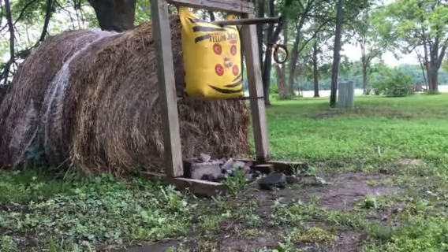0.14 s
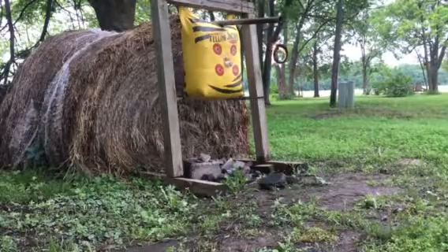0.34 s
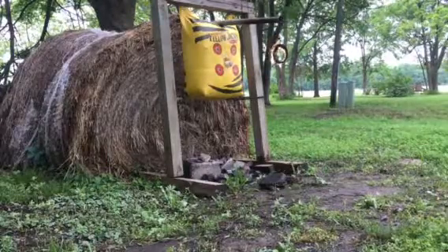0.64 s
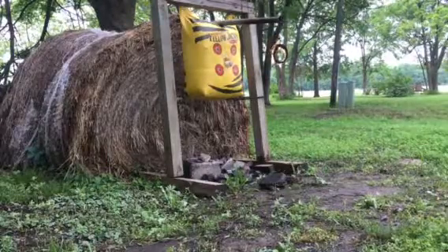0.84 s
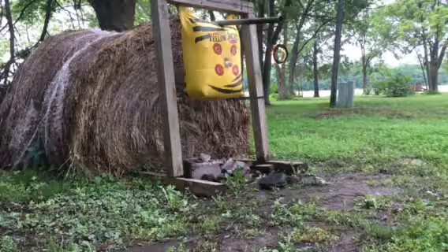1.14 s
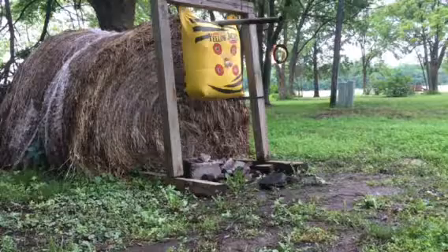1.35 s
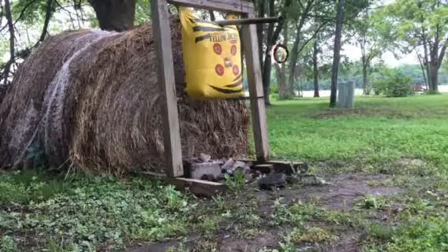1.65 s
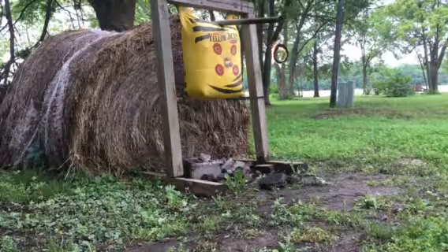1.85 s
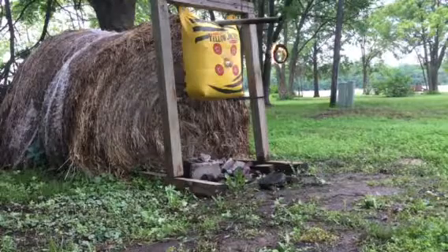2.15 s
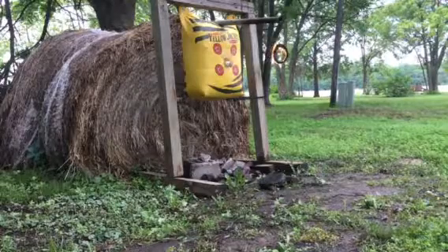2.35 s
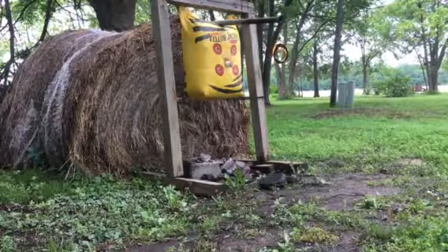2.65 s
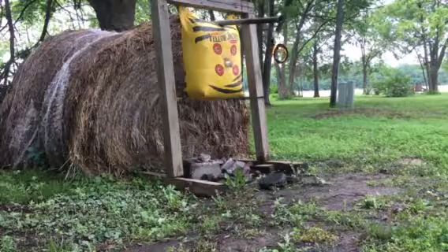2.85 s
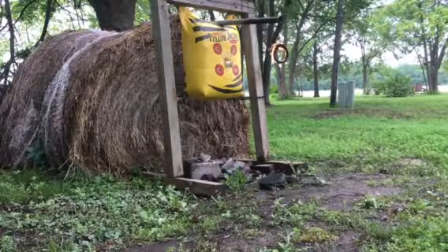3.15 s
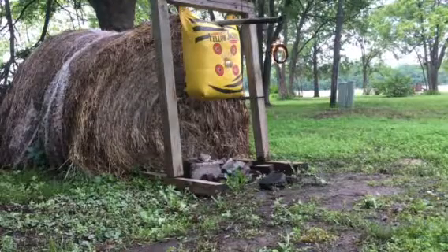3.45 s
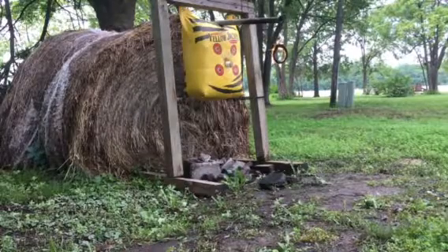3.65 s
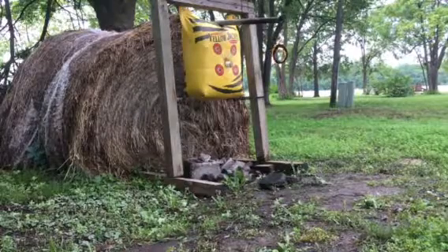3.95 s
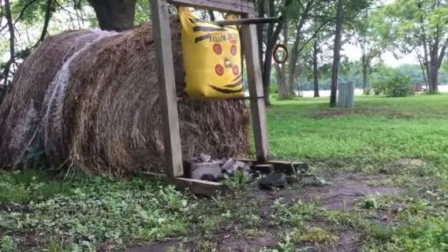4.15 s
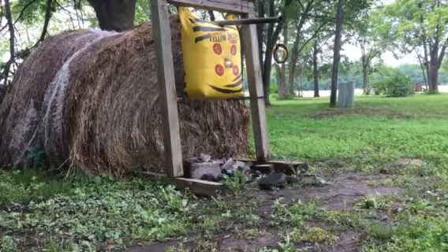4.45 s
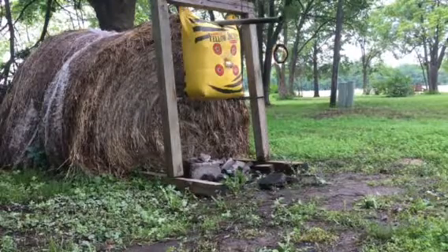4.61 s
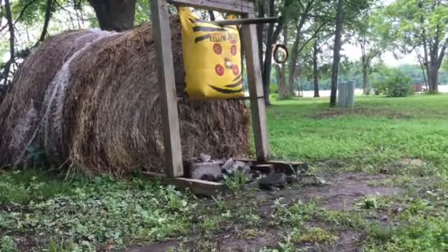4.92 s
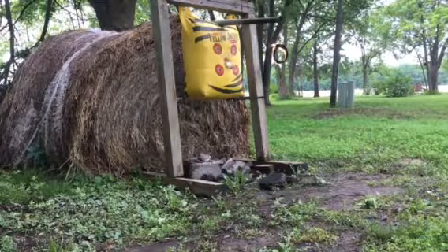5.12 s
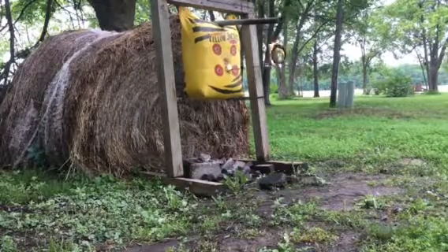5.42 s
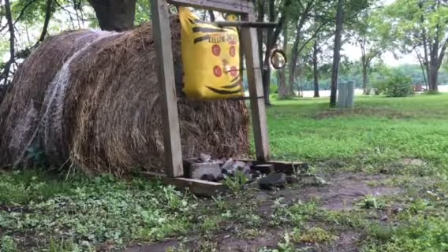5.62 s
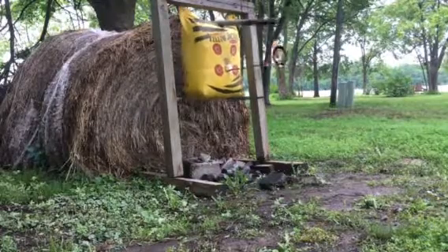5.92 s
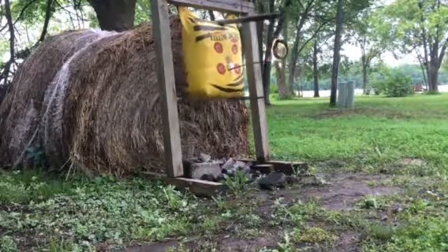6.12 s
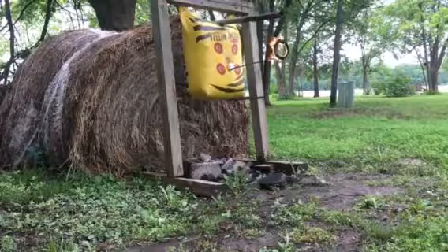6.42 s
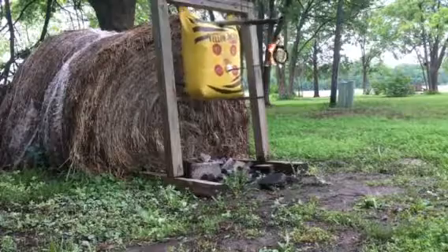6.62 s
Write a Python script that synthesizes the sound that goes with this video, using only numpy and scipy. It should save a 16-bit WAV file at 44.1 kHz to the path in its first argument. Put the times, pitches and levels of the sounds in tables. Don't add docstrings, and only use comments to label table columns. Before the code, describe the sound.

Outdoors on a tree-ringed lawn, uneven wind thumps and flutters on an exposed microphone over a soft wash of leaves. Faint birds whistle and trill, mostly far and echoey, with one hoarse high trill nearer. After about five and a half seconds a bowstring snaps, followed almost at once by a loud, dry double smack into a stuffed bag. Trunks scatter it back, then a faint tree-line echo fades under the wind.

```python
import sys
import numpy as np
from scipy import signal
from scipy.fft import rfft, irfft, next_fast_len
from scipy.io import wavfile

SR = 44100
rng = np.random.default_rng(int(sys.argv[2]) if len(sys.argv) > 2 else 0)


def attenuation_scalar(level_db):
    decades = np.asarray(level_db, float) / 20
    return 10 ** decades


def output_pcm(signal):
    pcm = np.clip(np.atleast_2d(signal).T, -1, 1) * 32767
    wavfile.write(sys.argv[1], SR, np.round(pcm).astype(np.int16))


N = 298645
T = np.arange(N) / SR

# t/s, level/dB
WIND = [(0.0, -59.5), (.3, -47.5), (.62, -52), (.92, -40.5), (1.02, -51), (1.4, -43.5), (1.56, -49.5),
        (1.95, -32), (2.3, -50.5), (2.62, -44), (3.1, -41.5), (3.4, -48.5), (3.88, -54.5), (4.2, -45),
        (4.9, -40), (5.55, -46), (6.3, -42.5), (6.77, -55.5)]
# middle t/s, rumble swing/dB, length/s, extra flutter/dB
BUFFETS = [(0.419, 15.5, 0.1, 12.5), (0.464, -3, .05, 2), (0.551, 9.5, .1, -3), (1.061, 15.5, 0.069, -26),
           (1.4, 2.5, 0.085, 0), (1.609, 8.5, 0.15, 0), (1.68, -7.5, 0.086, 11), (1.745, 8, 0.11, -2),
           (2.685, -17, 0.11, 12), (2.868, 6, 0.21, 7), (3, -11, 0.13, 10), (3.067, 8.5, 0.097, 2),
           (3.525, -11, 0.15, 15), (3.598, 9, 0.077, 2), (3.699, 17, 0.16, 3), (3.962, 16, 0.15, 3.5),
           (4.042, -5, 0.079, -10), (4.308, 6, 0.058, -6), (4.407, 12.5, 0.064, -8),
           (4.49, 9.5, 0.17, -1.5), (4.994, -12, 0.064, 6), (5.068, 3, 0.051, 18.5),
           (5.238, 10.5, 0.035, -2.5), (5.325, -2.5, 0.16, -1), (5.416, 10.5, 0.17, 14),
           (5.515, 11, 0.053, 10), (5.623, -20, 0.036, 2), (6.126, 14, 0.079, 13), (6.327, 1, 0.11, -17),
           (6.434, 12, 0.13, 4.5)]
# f/Hz, level/dB per Hz
RUMBLE = [(13, -42), (22, -21), (48, 1), (76, 1.5), (124, -6), (168, -14.5), (231, -25.5), (300, -40),
          (390, -84), (660, -120)]
FLUTTER = [(60, -10), (130, 5.5), (250, -2), (450, -22.5), (800, -27)]
# t/s, peak level/dB, length/s, top f/Hz
EDDIES = [(0.388, -37, 0.032, 474), (0.507, -28, 0.019, 495), (1.745, -32, 0.033, 260),
          (1.812, -31, 0.024, 310), (1.88, -33.5, 0.041, 480), (1.947, -26, 0.019, 580),
          (1.994, -25.5, 0.024, 387), (2.088, -38, 0.049, 346), (2.713, -32, 0.018, 314),
          (3.084, -32, 0.033, 350), (3.135, -35.5, 0.019, 480), (3.584, -28.5, 0.0092, 238),
          (3.943, -28.5, 0.029, 400), (4.172, -28.5, 0.042, 265), (4.194, -28, 0.018, 475),
          (4.464, -36, 0.03, 458), (5.063, -29, 0.023, 246), (5.869, -38.5, 0.056, 255),
          (6.095, -22.5, 0.0302, 410), (6.131, -34.5, 0.028, 483), (6.403, -27, 0.024, 367),
          (6.425, -26.5, 0.017, 774), (3.185, -34, 0.027, 350), (4.765, -42, 0.036, 476),
          (3.67, -41, 0.04, 420), (1.125, -39, 0.018, 323), (.87, -49.5, 0.062, 400)]
FLURRIES = [(.22, -43, .03, 200), (.285, -38, .03, 200), (.508, -33, .012, 420), (.76, -45, .04, 260),
            (1.86, -37, .025, 250), (1.953, -41, .008, 1100), (2.05, -41, .02, 600),
            (2.118, -40, .025, 480), (3.435, -38, .04, 240), (3.635, -42, .03, 380), (3.94, -39, .03, 600),
            (4.09, -41, .025, 300), (4.18, -35, .03, 260), (5.06, -37, .02, 320), (5.18, -36, .03, 240),
            (5.235, -37, .025, 260), (5.66, -44, .03, 140), (6.52, -42, .04, 200)]
# t/s, peak level/dB, length/s, f/Hz
WHIRLS = [(3.94, -31, .024, 271.5), (4.178, -32.5, .03, 177.5), (5.06, -33.5, .018, 210),
          (1.945, -35, .014, 334), (4.46, -35.5, .025, 189), (3.58, -37, .02, 251), (6.098, -34, .016, 301),
          (6.408, -34.5, .014, 300)]
# t/s, level/dB
BREEZE = [(0.0, -70), (.31, -74.5), (1.65, -72.5), (2.11, -69.5), (2.56, -70), (3.77, -77), (4.0, -79),
          (5.05, -71.5), (5.4, -71), (6.24, -82), (6.77, -79)]
# f/Hz, level/dB per Hz
FAR_AIR = [(150, -1), (250, -3), (788, -5), (845, -5.5), (1260, -8.5), (1530, -9.5), (2240, -9.5),
           (3060, -7.5), (4900, -15), (6360, -10.5), (7060, -13.5), (8120, -16), (10500, -21.5),
           (14900, -23.5), (16000, -26)]
RUSTLE = [(3000, 1), (5000, 0.5), (7000, -1.5), (9000, 5), (10500, -2.5), (12500, 1.5), (16000, -2.5)]
# middle t/s, length/s, level/dB, top f/Hz
FAR_SONGS = [(.08, .15, -63.5, 7270), (.28, 0.32, -62, 7000), (.74, .5, -65, 7400), (1.41, .36, -59, 7350),
             (1.83, 0.33, -63, 6950), (2.31, .14, -62, 7300), (2.42, 0.32, -59.5, 6900),
             (2.57, .2, -55, 7120), (3.21, .14, -61, 6850), (3.32, .2, -58, 7350), (3.47, 0.4, -56.5, 7200),
             (3.97, 0.46, -63, 7380), (4.33, 0.47, -56.5, 7220), (6.62, 0.44, -61.5, 7400)]
# t/s, level/dB, t60/s, centre f/Hz, width/Hz
CRACKS = [
    (0.0514, -46, 0.02, 8000, 8000),
    (5.408, -40, 0.036, 2000, 3080),
    (5.41, -26, .016, 5500, 10000),
    (5.413, -37.5, 0.13, 900, 1980),
    (5.4817, -14, .016, 6000, 11000),
    (5.482, -15, .016, 2600, 2600),
    (5.4895, -9.5, .009, 7500, 14000),
    (5.4842, -23, 0.05, 1620, 3570),
    (5.4928, -17, 0.012, 5000, 9000),
    (5.4945, -22, 0.06, 3000, 9000),
]
# t/s, signed height, f/Hz, t60/s
PUSHES = [(.05145, .04, 8700, .003), (.0515, .012, 5900, .005), (.0514, .014, 11500, .003),
          (5.411, -.05, 90, .03), (5.416, .07, 65, .06), (5.495, .1, 78, .1), (5.412, .011, 870, .13),
          (5.412, .013, 1150, .13), (5.482, .26, 3000, .012), (5.4828, -.34, 1300, .01),
          (5.4901, .45, 2300, .007), (5.483, .06, 880, .03), (5.4905, -.36, 1450, .007),
          (5.4833, .24, 2100, .008), (5.4924, -.38, 320, .013)]
# f/Hz, width/Hz, depth 0-1
HOUSING_DIPS = [(640, 120, .7), (4950, 360, 0.35), (10500, 1000, .8)]
# t/s, level/dB
FLIGHT = [(5.41, -53), (5.414, -34), (5.44, -42), (5.48, -40), (5.5, -60)]
# f/Hz, level/dB per Hz
VANES = [(290, -31), (450, 8), (630, 3), (900, 11), (1180, 0.5), (2290, 6.5), (4030, 6.5), (5090, 1),
         (6420, 9), (16000, -4.5)]
# t/s, length/s, f/Hz, level/dB
HELD = [(.19, 0.11, 3910, -68), (.2, .12, 3320, -64.5), (.25, .025, 3280, -60), (.245, .025, 2950, -65),
        (.325, 0.03, 2330, -67), (.865, .03, 3380, -66), (1.86, .02, 3170, -64), (1.885, .055, 2470, -63.5),
        (1.31, .025, 3220, -64), (3.52, 0.032, 3000, -64), (3.49, .03, 2780, -70), (3.95, .035, 3500, -62),
        (4.045, 0.042, 2680, -58), (4.28, .015, 2230, -66), (4.895, .03, 2290, -65), (4.68, .03, 2680, -66),
        (.625, .044, 3060, -65), (.829, 0.13, 2333, -65), (.929, 0.086, 2800, -63), (1.33, 0.13, 3260, -69),
        (1.437, 0.055, 2685, -54), (1.49, 0.065, 3620, -63.5), (1.556, 0.027, 2707, -53),
        (1.68, 0.068, 2690, -68), (2.05, .038, 1890, -66), (2.42, .04, 4680, -69), (1.33, 0.042, 3000, -65),
        (4.065, 0.071, 3080, -60), (4.225, 0.045, 4230, -66), (3.84, .08, 1270, -70),
        (4.455, 0.014, 6380, -59.5), (4.945, 0.018, 5900, -58), (4.351, 0.052, 3620, -64),
        (4.583, 0.06, 3350, -65), (4.732, 0.12, 2120, -67.5), (4.758, 0.068, 2700, -63),
        (4.815, 0.13, 7400, -60), (4.91, 0.028, 2500, -60.5), (5.125, 0.023, 2400, -59.5),
        (5.21, 0.094, 2480, -65), (5.235, 0.02, 4100, -65), (5.29, 0.051, 2390, -57.5),
        (5.33, 0.076, 7300, -61), (6.37, 0.035, 4170, -67), (2.975, .07, 6350, -61), (6.12, .05, 3200, -69),
        (6.2, .06, 3500, -70), (6.25, .06, 2950, -69)]
# t/s, length/s, first f/Hz, level/dB
FALLS = [(.655, 0.051, 2860, -70), (1.172, 0.045, 3920, -65), (1.225, 0.023, 2800, -59),
         (1.89, 0.054, 2750, -64), (2.025, .03, 2460, -62), (2.03, .025, 2950, -62), (.935, .02, 3020, -67),
         (3.65, 0.017, 2060, -64.5), (4.185, .014, 4150, -64), (4.335, 0.017, 4160, -63),
         (5.255, .015, 3610, -65), (5.325, 0.03, 2230, -65), (1.01, .07, 2250, -67),
         (4.02, 0.027, 2940, -56), (4.105, 0.05, 2270, -65.5), (4.298, 0.018, 3340, -64),
         (4.558, 0.055, 2830, -58.5), (5.1, 0.04, 3220, -62), (5.272, .033, 2400, -59),
         (5.379, .036, 3380, -62), (6.46, 0.034, 1270, -62)]
RISES = [(1.99, .018, 2310, -59), (1.38, 0.041, 2240, -58), (.81, .025, 2400, -65), (1.299, .03, 2800, -62),
         (1.96, .054, 2190, -60.5), (1.995, 0.031, 2540, -56.5), (4.501, .077, 2835, -59.5),
         (5.159, 0.051, 2267, -55), (6.27, 0.049, 2200, -70)]
# t/s, first f/Hz, level/dB
FLICKS = [(3.762, 3250, -61), (3.793, 3150, -60), (3.812, 2950, -61), (3.826, 3400, -66),
          (3.842, 2850, -59.5), (3.875, 3200, -63), (3.858, 3100, -64), (3.886, 3150, -63),
          (3.903, 2980, -59), (3.916, 3200, -64), (3.935, 2950, -61), (3.948, 3250, -61)]
# t/s, length/s, first f/Hz, last f/Hz, level/dB
SWOOPS = [(.704, .013, 2380, 2760, -57), (.716, .02, 2760, 2480, -59), (.752, 0.015, 2350, 2100, -58),
          (0.76, .028, 2110, 1970, -60), (.894, .018, 2760, 2320, -59), (.663, .018, 2850, 2620, -62),
          (1.405, .018, 2160, 2350, -57), (1.419, .022, 2330, 2700, -55.5), (1.544, 0.015, 3020, 2700, -59),
          (3.962, .014, 3250, 2800, -60), (.843, .026, 2350, 2350, -60), (1.257, .04, 2720, 2450, -63),
          (3.798, .012, 3100, 3790, -60), (3.926, .012, 3000, 3600, -62)]
# first note t/s, last note t/s, level/dB, lowest f/Hz, octave level/dB
SONGS = [
    (2.631, 2.966, -52, 5930, -13),
    (4.448, 4.801, -50.5, 5700, -10.5),
    (4.931, 5.266, -51.5, 4380, -10),
]
HURRY = [0.0088, 0.21, 0.0089]
UNEVEN = [0.56, 0.74, 0.38]
SLIDE = [0.23, 1, 0.7, 0.58, 0.25, 0]
HOLD = [0.475, 0.94, 1, 0.94, 0.091, 0.11]
ARCH = [.5, 1, .78, 0.44, .3, 0]
# t/s, length/s, lowest f/Hz (sounds an octave up), level/dB
ARCHES = [(4.538, .034, 5750, -72), (4.604, 0.039, 5450, -65), (4.677, .04, 5670, -63),
          (4.757, .036, 6000, -64), (5.012, .028, 4500, -72), (5.077, .034, 4450, -67),
          (5.108, .042, 5700, -65), (5.152, .036, 4230, -61), (5.187, .042, 5300, -63),
          (5.229, .034, 4500, -64)]
# t/s, length/s, first f/Hz, last f/Hz, level/dB
TAILS = [(4.592, .008, 13600, 11400, -66), (4.67, .007, 12200, 10600, -71),
         (4.738, 0.022, 13900, 11900, -65), (5.064, .01, 13600, 11800, -71), (5.226, .01, 10200, 8400, -69)]
# f/Hz, level/dB per Hz
GROVE = [(180, -36), (300, 1), (385, -0.5), (701, -9.5), (870, -11.5), (1210, -8), (3190, -2.5), (4160, -6),
         (4910, -19), (5700, -6.5), (9240, -8.5), (15000, -12), (16000, -14)]
TREE_LINE = [(290, -47), (500, -7), (553, -3.5), (960, -14), (1050, -5.5), (3110, -3), (4870, -13.5),
             (6140, -6.5), (8580, -10), (14700, -21), (16000, -25)]
# t/s, peak level/dB, f/Hz
REPEATS = [(5.528, -30, 3500), (5.541, -34, 2500), (5.577, -36, 3000), (5.59, -39, 6500),
           (5.617, -38, 2000), (5.648, -43, 2300), (5.703, -42, 2600), (5.728, -43, 3000),
           (5.745, -43, 2400), (5.762, -41, 3100), (5.8, -46, 2800), (5.71, -46, 6500)]
# f/Hz, width/Hz, depth 0-1
PORT_DIPS = [(4950, 400, .18), (10500, 600, .2)]


def rms_one(x):
    return x / np.sqrt(np.mean(x ** 2) + 1e-20)


def in_time(rows):
    s, level_db = np.transpose(rows)
    return np.interp(T, s, level_db)


def swell(middle_s, length):
    return np.cos(np.pi * np.clip((T - middle_s) / length, -.5, .5)) ** 2


def drift(rate_hz):
    low = signal.butter(2, rate_hz, fs=SR, output="sos")
    slow = signal.sosfilt(low, rng.standard_normal(N + SR))
    return rms_one(slow[SR:])


def coloured(spectrum):
    hz, level_db = np.transpose(spectrum)
    size = next_fast_len(N)
    grid = np.log(np.maximum(np.fft.rfftfreq(size, 1 / SR), 1))
    beyond = np.maximum(np.log(hz[0]) - grid, 0) + np.maximum(grid - np.log(hz[-1]), 0)
    shape = attenuation_scalar(np.interp(grid, np.log(hz), level_db) - 51 * beyond)
    return rms_one(irfft(rfft(rng.standard_normal(size)) * shape, size)[:N])


def resonance(x, centre_hz, width_hz):
    r = np.exp(-np.pi * width_hz / SR)
    turn = np.cos(2 * np.pi * centre_hz / SR)
    return signal.lfilter([(1 - r * r) / 2, 0, (r * r - 1) / 2], [1, -2 * r * turn, r * r], x)


def without_bands(x, dips):
    for hz, width_hz, depth in dips:
        x = x - depth * resonance(x, hz, width_hz)
    return x


def add(out, s, piece):
    i = round(s * SR)
    out[i:i + len(piece)] += piece[:N - i]


def progress(length):
    return np.arange(round(length * SR)) / (length * SR)


def scatter(x, t60, wet_db, trunks_per_s=44100):
    t = T[:SR // 2]
    cloud = rng.standard_normal(len(t)) * attenuation_scalar(-60 * t / t60) * (t > .004)
    cloud = cloud * (rng.random(len(t)) < trunks_per_s / SR)
    cloud = cloud / np.sqrt(np.sum(cloud ** 2))
    return x + attenuation_scalar(wet_db) * signal.fftconvolve(x, cloud)[:N]


def glides(notes, waver_share):
    out, waver = np.zeros(N), drift(32.8)
    for s, length, first_hz, last_hz, level_db in notes:
        u = progress(length)
        unsteady = 1 + waver_share * np.resize(waver[round(s * SR):], len(u))
        hz = (first_hz + (last_hz - first_hz) * u) * unsteady
        tone = np.sin(2 * np.pi * np.cumsum(hz) / SR)
        add(out, s, attenuation_scalar(level_db + 2.0) * np.sin(np.pi * u) ** 0.21 * tone)
    return out * attenuation_scalar(1.6 * drift(50))


def puffs(rows):
    out, t = np.zeros(N), T[:SR // 8]
    for s, level_db, length, top_hz in rows:
        heavy = np.cumsum(rng.standard_normal(2 * len(t)))
        band = signal.butter(4, [60, top_hz], "band", fs=SR, output="sos")
        puff = signal.sosfilt(band, heavy)[len(t):]
        puff = puff / puff[t < length].std()
        add(out, s - .004, attenuation_scalar(level_db - 2.5) * puff * np.sin(np.pi * np.minimum(t / length, 1)) ** 2)
    return out


def wind():
    rumble_db = in_time(WIND)
    flutter_db = -13 + 0.52 * (rumble_db - rumble_db.mean())
    for s, swing_db, length, sharp_db in BUFFETS:
        bump = swell(s, length)
        rumble_db = rumble_db + swing_db * bump
        flutter_db = flutter_db + sharp_db * bump
    out = attenuation_scalar(rumble_db + 1.5 * drift(13.0)) * coloured(RUMBLE)
    out += attenuation_scalar(rumble_db + flutter_db + 3.95 * drift(22.2) - 4.0) * coloured(FLUTTER)
    return out + puffs(EDDIES) + puffs(FLURRIES)


def far_air_db():
    breeze_db = in_time(BREEZE)
    return -58 - 0.346 * T + 0.017 * (breeze_db - breeze_db.mean())


def leaves():
    wash = attenuation_scalar(far_air_db() + 0.5 * drift(4.6)) * coloured(FAR_AIR)
    gust_start_s, gust_end_s = 1.7, 2.03
    through = np.clip((T - gust_start_s) / (gust_end_s - gust_start_s), 0, 1)
    gust = attenuation_scalar(-66) * np.sin(np.pi * through) ** 0.52
    rustle = (attenuation_scalar(in_time(BREEZE) + 3.5) + gust) * attenuation_scalar(0.76 * drift(30)) * coloured(RUSTLE)
    return wash + rustle


def chorus(count=220):
    when, long, pitch, bend, loud = rng.random((count, 5)).T
    hz = 2000 * 1.85 ** pitch
    last_hz = hz * (0.95 + .2 * bend)
    level_db = -79 + 11.0 * loud - 4.0 * pitch
    notes = zip(when * (N / SR - .2), 0.0198 + 0.046 * long, hz, last_hz, level_db)
    singers = scatter(glides(notes, waver_share=0.0238), t60=0.4, wet_db=5.5)
    return singers * attenuation_scalar(far_air_db() + 55.5)


def far_trills():
    middles, _, _, tops = np.transpose(FAR_SONGS)
    gain = attenuation_scalar(-67) * (T < SONGS[1][0])
    for s, length, level_db, _ in FAR_SONGS:
        gain = gain + attenuation_scalar(level_db) * swell(s, length)
    wobble = signal.sawtooth(2 * np.pi * 27 * T + 1.4 * drift(2.96), .2)
    hz = np.interp(T, middles, tops) + 330 * wobble
    line = gain * attenuation_scalar(3.6 * drift(29) - 8.5) * np.sin(2 * np.pi * np.cumsum(hz) / SR)
    return scatter(line, t60=0.47, wet_db=0.5)


def cracks():
    out, t = np.zeros(N), T[:SR // 4]
    for s, level_db, t60, centre_hz, width_hz in CRACKS:
        noise = rms_one(resonance(rng.standard_normal(len(t)), centre_hz, width_hz))
        crack = attenuation_scalar(level_db - 60 * t / t60) * np.minimum(t / 0.00013, 1) * noise
        add(out, s, without_bands(crack, HOUSING_DIPS))
    return out


def pushes():
    out, t = np.zeros(N), T[:SR // 4]
    for s, height, hz, t60 in PUSHES:
        add(out, s, height * attenuation_scalar(-60 * t / t60) * np.sin(2 * np.pi * hz * t))
    return out


def whistles():
    notes = []
    for rows, bend in ((HELD, 0.97), (FALLS, .89), (RISES, 1.13)):
        for s, length, hz, level_db in rows:
            notes.append((s, length, hz, hz * bend, level_db))
    chances = np.resize(rng.standard_normal(9), len(FLICKS))
    for (s, hz, level_db), chance in zip(FLICKS, chances):
        notes.append((s, .015, hz, hz * (1.19 + 0.018 * chance), level_db))
    dive = (3.977, .017, 3050, 1930, -58)   # t/s, length/s, first f/Hz, last f/Hz, level/dB
    return scatter(glides(notes + [dive] + list(SWOOPS), waver_share=.004), t60=.45, wet_db=-2.8)


def drone():
    hollow = rms_one(resonance(rng.standard_normal(N), 650, 90))
    return attenuation_scalar(-70 + 4.9 * drift(25)) * swell(1.25, 1.5) * hollow


def whirls():
    out = np.zeros(N)
    for s, level_db, length, hz in WHIRLS:
        u = progress(length)
        sinking_hz = hz * 0.74 ** (u - .5)
        throb = np.sin(2 * np.pi * np.cumsum(sinking_hz) / SR)
        add(out, s, attenuation_scalar(level_db) * np.sin(np.pi * u) ** 2 * throb)
    return out


def trill_notes():
    note_gap_s, shallow_hz = .0365, 5900
    for (first, last, level_db, low_hz, octave_db), hurry, uneven in zip(SONGS, HURRY, UNEVEN):
        gaps = round((last - first) / note_gap_s)
        for k in range(gaps + 1):
            u = k / gaps
            light = uneven * ((gaps - k + 1) % 2) + (k == gaps)
            lack = max(1 - u / 0.78, 0)
            depth = (1 - lack) * (1 - 0.49 * light)
            s = first + (last - first) * (u - hurry * u * (1 - u))
            note_db = level_db - 6.5 * lack ** 2 - 1.5 * light
            note_octave_db = octave_db - 10 * lack - 6 * light
            yield s, note_db, shallow_hz + (low_hz - shallow_hz) * depth, note_octave_db


def falling_note(low_hz, path, wobble, top_hz, length=.037):
    u = progress(length)
    uneven_path = np.minimum(path + 0.045 * wobble[:6], 1.05)
    path = np.interp(u, [0, .15, .35, .6, .8, 1], uneven_path)
    hz = low_hz + (top_hz + 60 * wobble[6] - low_hz) * path
    return np.sqrt(2 * np.sin(np.pi * u ** 0.57)), 2 * np.pi * np.cumsum(hz) / SR


def near_trill():
    voice, octave = np.zeros((2, N))
    notes = list(trill_notes())
    wobbles = rng.standard_normal((len(notes), 7))
    for k, ((s, level_db, low_hz, octave_db), wobble) in enumerate(zip(notes, wobbles)):
        held = s < 4
        path, top_hz = (HOLD, 7400 + 450 * (k % 2)) if held else (SLIDE, 7530)
        shape, phase = falling_note(low_hz, np.array(path), wobble, top_hz)
        add(voice, s, attenuation_scalar(level_db) * shape * np.sin(phase))
        if held:
            add(octave, s, attenuation_scalar(level_db + octave_db) * shape * np.sin(2 * phase))
    hoarse = attenuation_scalar(3.6 * drift(220) + 0.4)
    voice = hoarse * resonance(voice, 7200, 1840)
    voice = signal.sosfilt(signal.butter(8, 8000, fs=SR, output="sos"), voice)
    octave = attenuation_scalar(-5.0) * hoarse ** 1.5 * octave
    voice = scatter(voice, t60=0.24, wet_db=-0.6, trunks_per_s=700)
    return voice + scatter(octave, t60=0.23, wet_db=-3.0, trunks_per_s=330)


def octave_strokes():
    out = np.zeros(N)
    for s, length, low_hz, level_db in ARCHES:
        shape, phase = falling_note(low_hz, np.array(ARCH), np.zeros(7), 7530, length)
        add(out, s, attenuation_scalar(level_db) * shape ** 0.55 * np.sin(2 * phase))
    strokes = out * attenuation_scalar(3.5 * drift(120) + 0.8)
    return scatter(strokes + glides(TAILS, waver_share=.004), t60=.22, wet_db=-5.5, trunks_per_s=900)


def vane_hiss():
    flying = (T > FLIGHT[0][0]) & (T < FLIGHT[-1][0])
    return attenuation_scalar(in_time(FLIGHT)) * flying * coloured(VANES)


def echoes(hit_s=5.49):
    since = np.maximum(T - hit_s, 0)
    dull = coloured(TREE_LINE)
    near = attenuation_scalar(-26.5 - 60 * since / 0.24) * coloured(GROVE) + attenuation_scalar(-44.5 - 60 * since / 0.94) * dull
    near = near * np.minimum(since / 0.0074, 1) * attenuation_scalar(1.8 * drift(160))
    late = np.maximum(since - .19, 0)
    back = np.roll(dull, SR)
    low = signal.sosfilt(signal.butter(4, 4900, fs=SR, output="sos"), back)
    top = signal.sosfilt(signal.butter(4, 4900, "high", fs=SR, output="sos"), back)
    dying = attenuation_scalar(-60 * late / 1.13) * low + attenuation_scalar(0.5 - 60 * late / 0.53) * top
    far = attenuation_scalar(-52.0) * dying * np.minimum(late / 0.028, 1)
    far += attenuation_scalar(-53) * swell(5.601, 0.14) * back
    return near + far * attenuation_scalar(0.85 * drift(28))


def repeats():
    out, t = np.zeros(N), T[:SR // 20]
    for s, level_db, hz in REPEATS:
        noise = rms_one(resonance(rng.standard_normal(len(t)), hz, 0.36 * hz))
        add(out, s, attenuation_scalar(level_db - 10.5 - 60 * t / 0.04) * noise)
    return out


def scene():
    air = wind() + leaves() + drone() + whirls()
    birds = chorus() + far_trills() + whistles() + near_trill() + octave_strokes()
    arrow = cracks() + pushes() + vane_hiss() + echoes() + repeats()
    return (air + birds + arrow)[None]


def roll_off(x):
    return signal.sosfilt(signal.butter(12, 16820, fs=SR, output="sos"), x)


def record(dry):
    heard = signal.sosfilt(signal.butter(2, 30, "high", fs=SR, output="sos"), dry)
    heard = without_bands(heard, PORT_DIPS)
    heard = signal.sosfilt(signal.cheby2(14, 32, 15950, fs=SR, output="sos"), heard)
    return roll_off(heard)


dry = scene()
out = record(dry)
output_pcm(out)
```